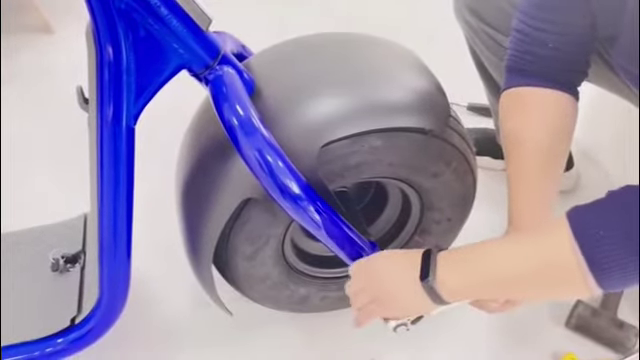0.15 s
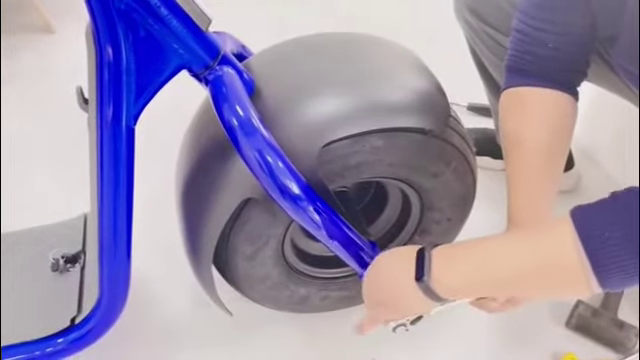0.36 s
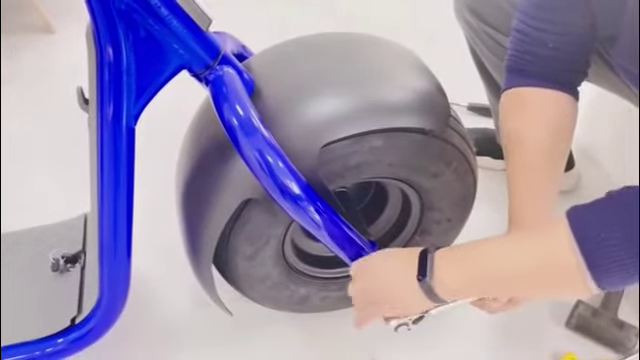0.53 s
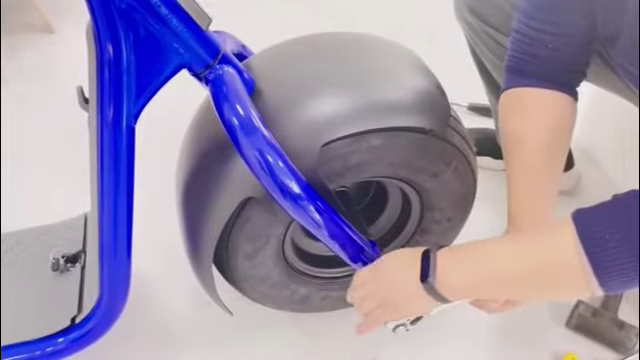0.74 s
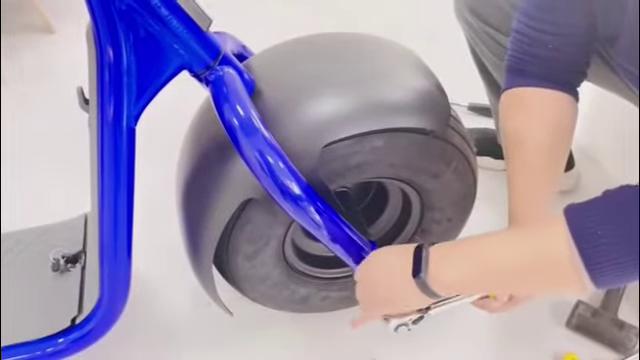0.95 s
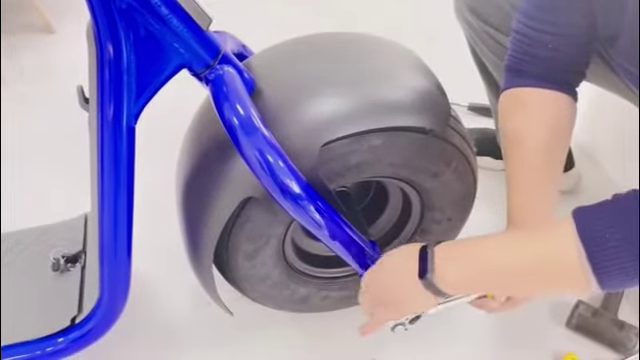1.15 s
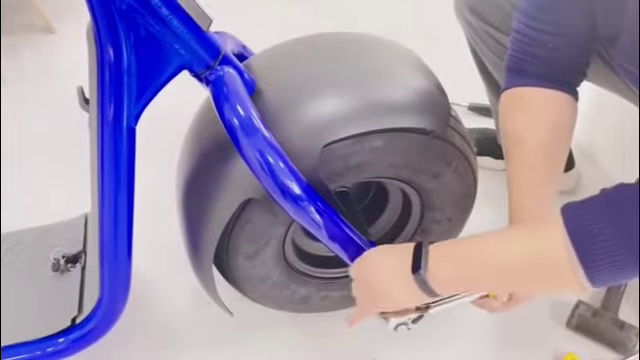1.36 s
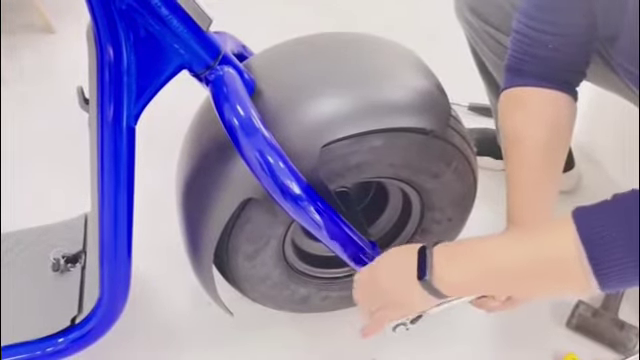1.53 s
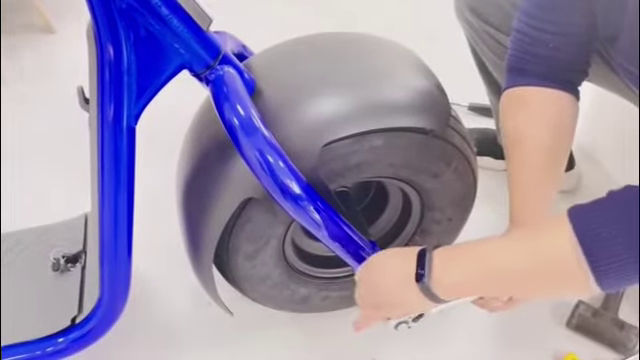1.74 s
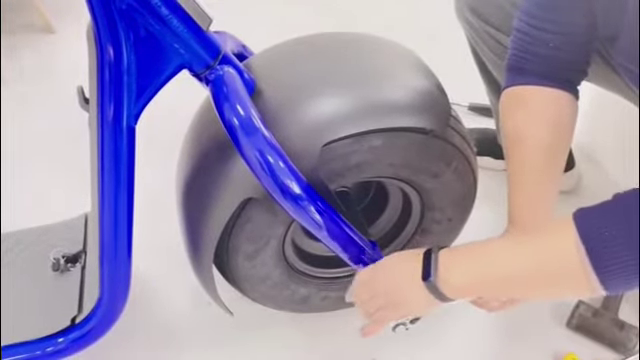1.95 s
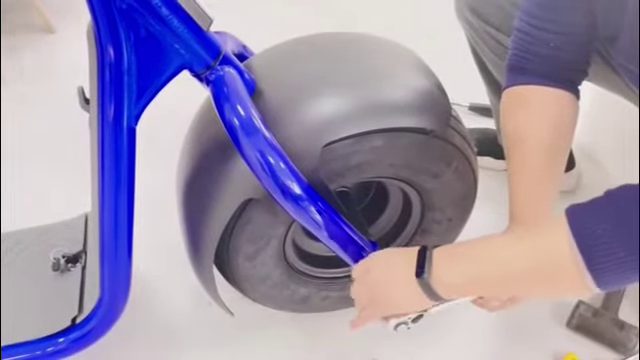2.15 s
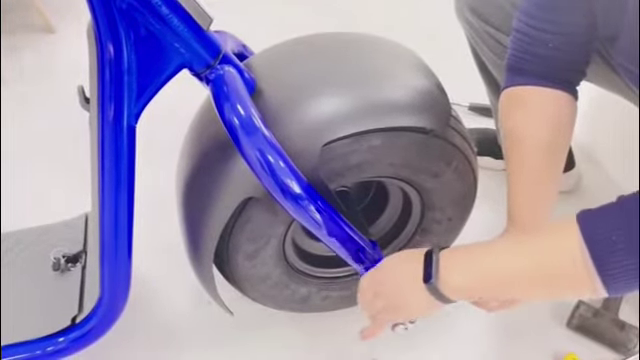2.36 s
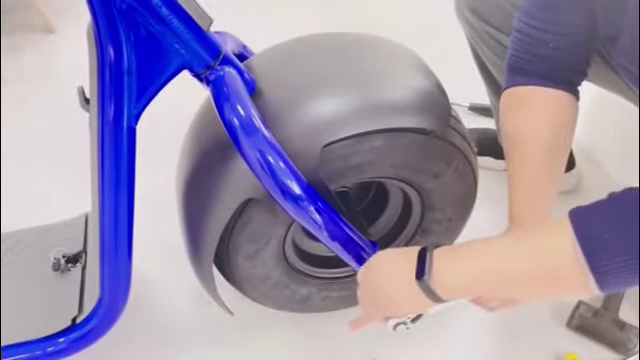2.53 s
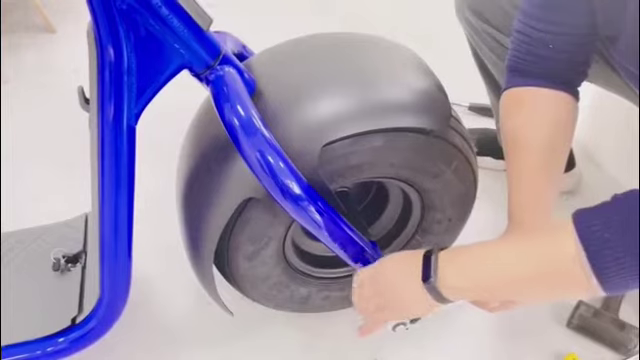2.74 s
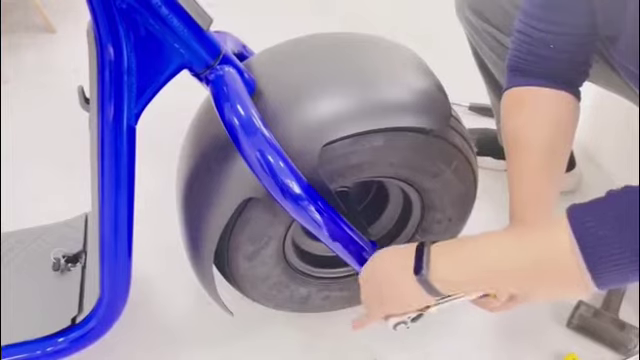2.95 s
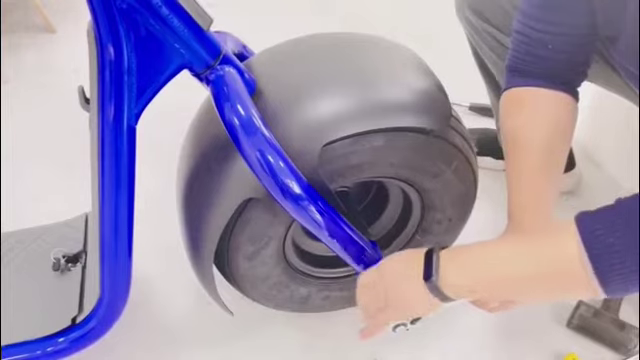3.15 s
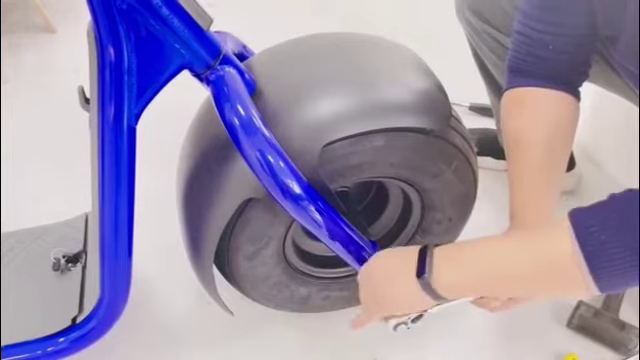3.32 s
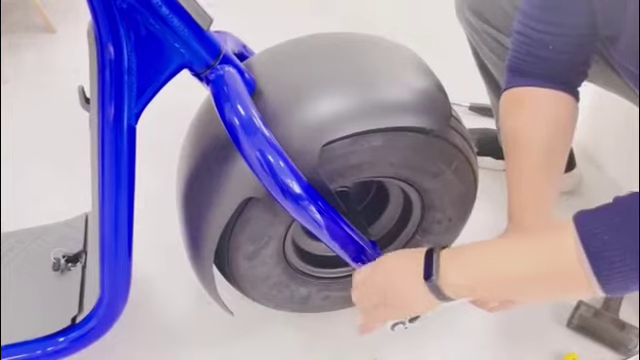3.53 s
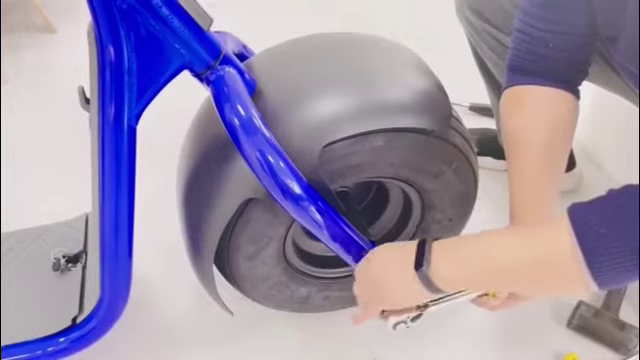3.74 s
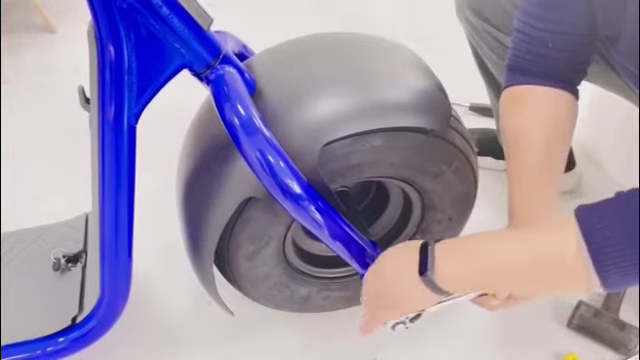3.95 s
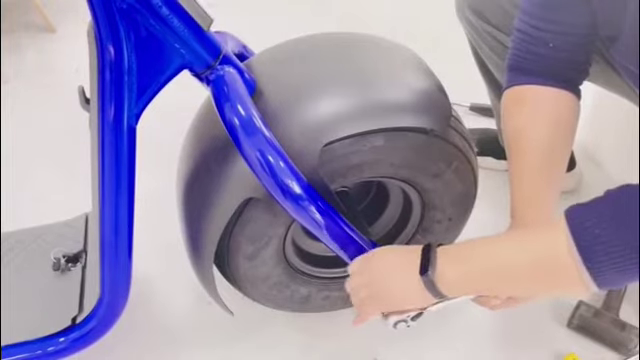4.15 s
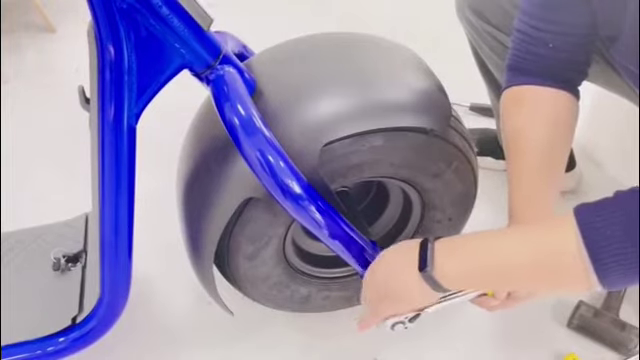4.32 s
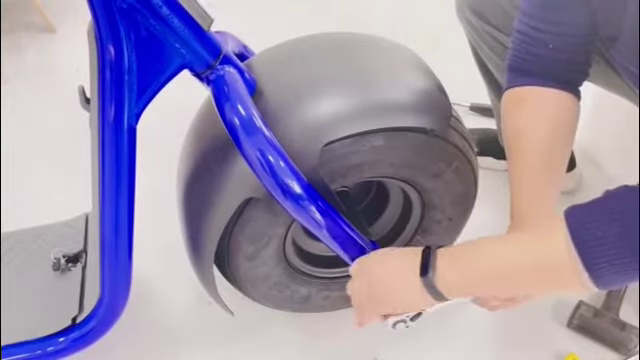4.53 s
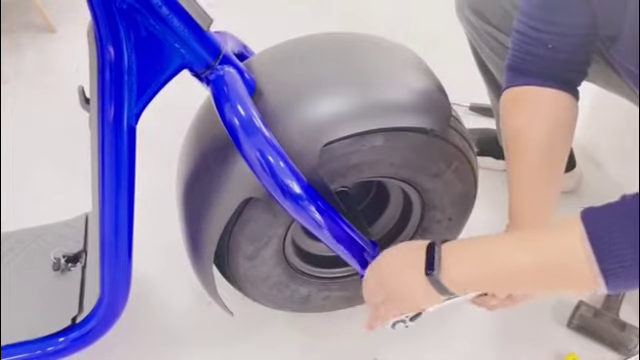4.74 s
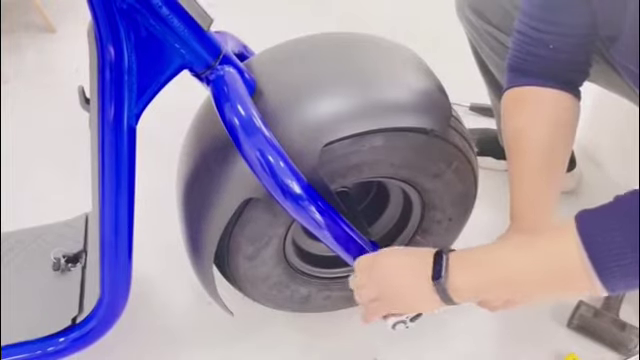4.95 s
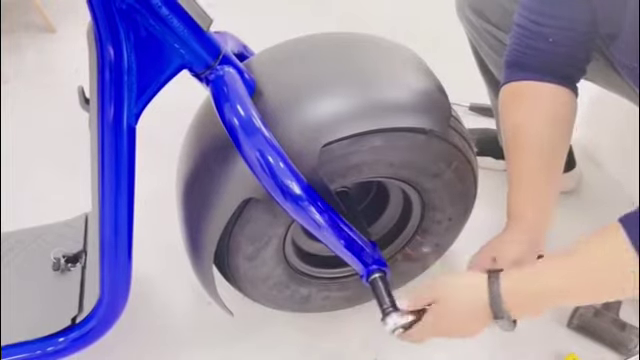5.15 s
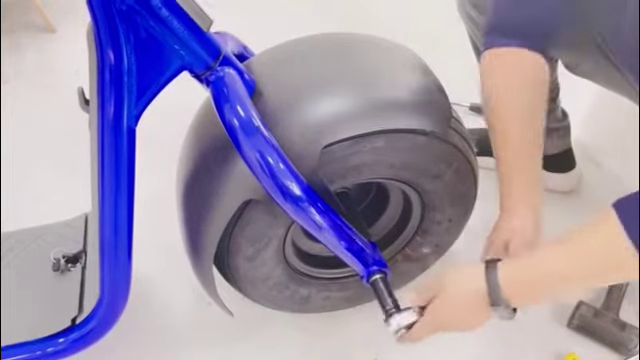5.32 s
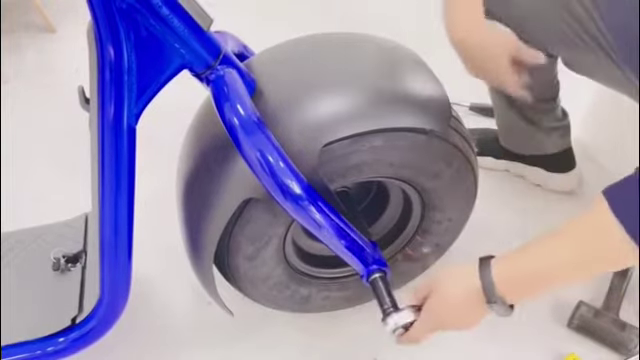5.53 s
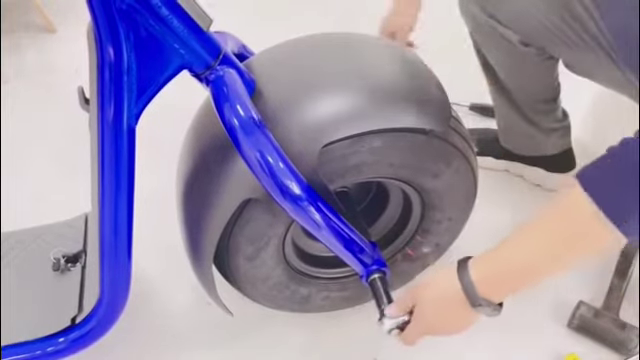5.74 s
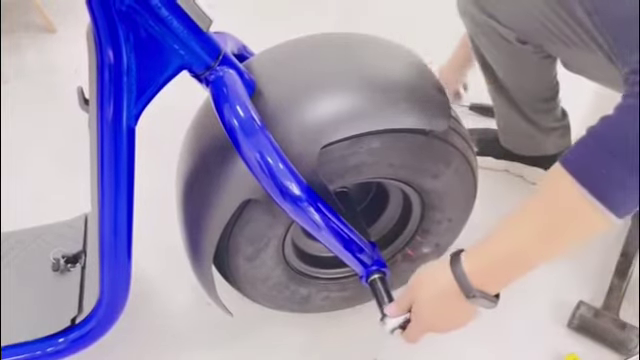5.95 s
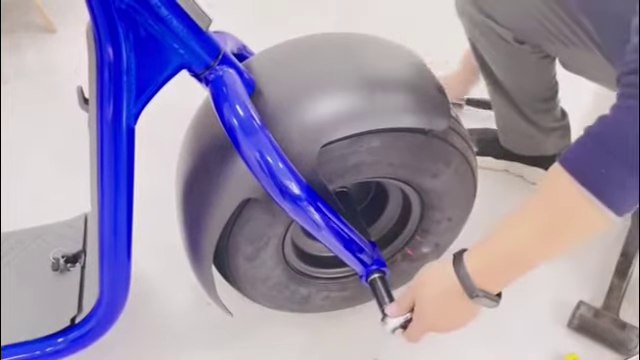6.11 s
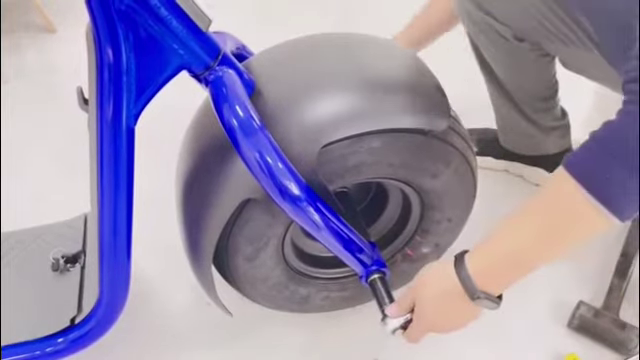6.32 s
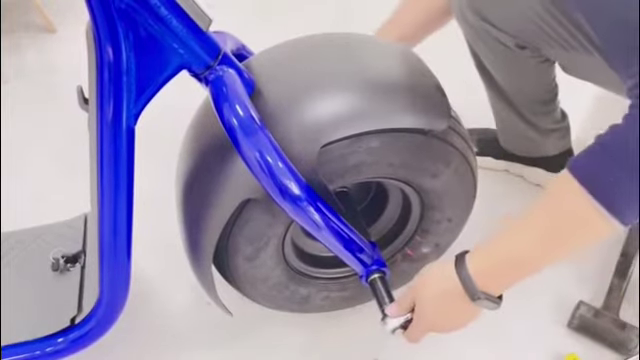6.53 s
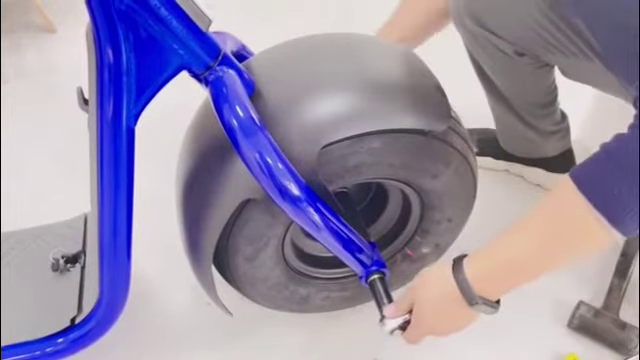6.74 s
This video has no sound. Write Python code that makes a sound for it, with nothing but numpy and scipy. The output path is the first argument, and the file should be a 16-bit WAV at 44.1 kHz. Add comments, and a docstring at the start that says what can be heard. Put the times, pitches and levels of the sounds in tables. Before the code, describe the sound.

Fast, bright ratchet zips repeat about every 0.4 seconds with dull socket knocks between, ending in sparse clicks and a sharp double clank.

```python
"""Ratchet wrench on an axle nut

A ratchet wrench tightens the axle nut of a fat wheel in a steel tube frame, in a bare workroom.
On each back swing the pawl snaps over the teeth: noisy impacts excite modes of the wrench head and the frame.
Softened impacts give the dull knocks of the socket; single teeth, then two hard blows on the axle, come last.
Slipping noise makes a helper's clothes rustle; shaped noise and a sine make the ventilation and mains hum."""
import sys
import numpy as np
from scipy import signal
from scipy.fft import rfft, irfft
from scipy.io import wavfile
from scipy.ndimage import uniform_filter1d

SR = 44100
rng = np.random.default_rng(int(sys.argv[2]) if len(sys.argv) > 2 else 0)


def generate_wav(signal):
    """Clip the signal to [-1, 1] and save it as 16-bit WAV at the path in sys.argv[1]."""
    frames = np.transpose(np.atleast_2d(signal))
    scaled = np.clip(frames, -1, 1) * 32767
    pcm = np.round(scaled).astype(np.int16)
    wavfile.write(sys.argv[1], SR, pcm)


N = 303408
T = np.arange(N) / SR
HZ = np.fft.rfftfreq(N, 1 / SR)


def undb(db):
    """Decibel definition: amplitude gain grows tenfold every 20 dB."""
    return 10 ** (np.asarray(db) / 20)


def unit(x):
    """Energy normalisation: the sum of squares becomes one."""
    return x / np.sqrt(np.sum(x ** 2))


def along(hz, points, values):
    """Logarithmic frequency scale: interpolate a curve between its points."""
    return np.interp(np.log(hz + 1), np.log(points), values)


def convolve(x, response):
    """Linear superposition: every sample of a sound launches the response."""
    return signal.fftconvolve(x, response)[:N]


def add(track, s, sound):
    """Superposition: mix a short sound into a track at time s."""
    start = max(0, int(s * SR))
    track[start:start + len(sound)] += sound[:max(0, N - start)]


def low_cut(x, corner_hz):
    """High-pass filtering: take away the bass."""
    return signal.sosfilt(signal.butter(2, corner_hz, "high", fs=SR, output="sos"), x)


def soften(force, corner_hz, order=2):
    """Contact stiffness: a softer contact lasts longer and loses its treble."""
    return signal.lfilter(*signal.butter(order, min(corner_hz, SR / 3), fs=SR), force)


def two_ears(mid, side, wide_hz):
    """Diffuse-field coherence: long waves reach both ears alike, short ones differ."""
    side = signal.lfilter(*signal.butter(1, wide_hz, "high", fs=SR), side)
    return np.array([mid + side, mid - side])


# ventilation noise spectrum: (frequency [Hz], relative spectral density [dB per Hz])
AIR_SPECTRUM = [(13, -57), (22, -14), (59, 1), (263, -18.5), (294, -16.5), (482, -27.5), (1670, -37),
                (2520, -35), (3810, -45.5), (4260, -42.5), (7000, -51.5), (8490, -52), (9220, -53),
                (14700, -63), (16000, -62)]
AIR_DB = -45  # level of the part common to both ears
HUM_HZ, HUM_DB = 49, -55.5


def ventilation():
    """Stationary random noise: a steady coloured rumble, with a sinusoidal mains hum."""
    noise = rfft(rng.standard_normal((2, N)))
    mid, side = irfft(noise * undb(along(HZ, *np.transpose(AIR_SPECTRUM))), N)
    rumble = undb(AIR_DB) * two_ears(mid, 0.6 * side, wide_hz=345) / mid.std()
    hum = np.sqrt(2) * undb(HUM_DB) * np.sin(2 * np.pi * HUM_HZ * T)
    return rumble + hum


# clothing as the helper stands up: (time [s], level [dB])
RUSTLE = [(5.8, -84), (5.97, -57.5), (6.06, -68), (6.14, -59.5), (6.45, -86)]


def clothing(low_hz, high_hz, grit_db):
    """Stick-slip friction: cloth slides in tiny uneven slips."""
    unevenness = np.repeat(rng.standard_normal(N // 128 + 1), 128)[:N]
    slips = rng.standard_normal(N) * undb(grit_db * unevenness)
    cloth = soften(low_cut(slips, low_hz), high_hz, order=1)
    level_db = np.interp(T, *np.transpose(RUSTLE), left=-np.inf, right=-np.inf)
    return cloth / cloth.std() * undb(level_db)


# the room's tail: (band centre [Hz], reverberation time [s], relative level [dB])
ROOM_BANDS = [(147, 0.69, 9), (580, 0.71, -6), (1330, 0.57, -9.5), (3480, 0.51, -13), (4960, 0.46, -9.5),
              (9000, 0.45, -12), (13900, 0.21, -17.5)]


def room(wall_s, build_s):
    """Reverberation: bands of noise start with the nearest wall and decay at their own rates."""
    t = T[:SR * 2 // 3]
    freqs = np.fft.rfftfreq(len(t), 1 / SR)
    centres = [row[0] for row in ROOM_BANDS]
    noise, tail = rfft(rng.standard_normal(len(t))), 0
    onset = np.clip((t - wall_s) / build_s, 0, 1)
    for (hz, t60, db), band in zip(ROOM_BANDS, np.eye(len(ROOM_BANDS))):
        band_noise = irfft(noise * along(freqs, centres, band), len(t))
        decay = np.exp(-np.log(1000) * t / t60)
        tail = tail + undb(db) * band_noise * unit(onset * decay)
    return tail


def even(x, span_hz):
    """Spectral whitening: level out broad colour and keep the fine ripple."""
    spectrum = rfft(x)
    power = uniform_filter1d(np.abs(spectrum) ** 2, max(3, int(span_hz * len(x) / SR)))
    return unit(irfft(spectrum / np.sqrt(power), len(x)))


def place(x, left_db, lead_s, near_db, near_s, room_db):
    """Interaural differences: direct sound leads on the left; scatter off floor, wheel and mudguard, then room."""
    t = np.maximum(T[:SR // 16] - .003, 0)
    fields = []
    for _ in range(2):
        scatter = even(rng.standard_normal(len(t)) * t * np.exp(-t / near_s), span_hz=120)
        echoes = undb(room_db) * room(wall_s=0.0067, build_s=0.0033)
        add(echoes, 0, undb(near_db) * scatter)
        fields.append(convolve(x, echoes))
    # a windowed sinc delays the right ear by a fraction of a sample
    taps = np.arange(-8, 9)
    late = np.convolve(x, np.sinc(taps - lead_s * SR) * np.hanning(len(taps)), "same")
    direct = undb(np.array([[left_db], [-left_db]]) / 2) * np.array([x, late])
    return direct + two_ears(*fields, wide_hz=1300)


def contact(rise_s, fall_s, grit_db, size=1024):
    """Rough impact: steel chatters on steel in micro-impacts, with the energy of 4 ms at full level."""
    t = T[:size]
    chatter = rng.standard_normal(size) * undb(grit_db * rng.standard_normal(size))
    envelope = np.minimum(t / rise_s, 1) ** 2 * np.exp(-np.maximum(t - rise_s, 0) / fall_s)
    return unit(chatter * envelope) * np.sqrt(.004 * SR)


def snap(spectrum, modes=(), size=8192):
    """Minimum phase: the most prompt causal response with a broad spectrum and resonances standing out of it."""
    freqs = np.fft.rfftfreq(size, 1 / SR)
    peaks = sum(undb(db) ** 2 / (1 + (2 * (freqs - hz) / width) ** 2) for hz, width, db in modes)
    magnitude = undb(along(freqs, *np.transpose(spectrum))) * np.sqrt(1 + peaks)
    # folding the cepstrum onto positive times makes the response causal
    cepstrum = irfft(np.log(magnitude))
    cepstrum[1:size // 2] *= 2
    cepstrum[size // 2 + 1:] = 0
    return unit(irfft(np.exp(rfft(cepstrum))))


# the socket and wrench shifting on the nut, and at last a light tick as the helper picks up a tool: (time [s],
# relative level [dB], contact hardness [Hz])
KNOCKS = [(0.172, -34, 635), (0.707, -36.5, 750), (0.853, -22, 600), (1.008, -34.5, 910),
          (1.416, -35.5, 1300), (1.951, -38, 1010), (2.659, -38, 900), (3.048, -33.5, 890),
          (3.273, -20, 600), (3.431, -39.5, 1480), (3.481, -30.5, 650), (3.517, -31, 670),
          (3.781, -35, 876), (4.277, -34.5, 920), (4.533, -38.5, 900), (4.666, -38, 945),
          (4.824, -24, 1220), (4.950, -42, 1100), (5.123, -48.5, 1000), (5.486, -26.5, 593),
          (5.587, -26, 620), (5.79, -42, 1100), (5.793, -26, 580), (6.111, -53, 9100)]


def knocks():
    """Soft impact: dull knocks as play in socket and nut is taken up, and a light tick of the helper's tool;
    returns the force on the frame."""
    force = np.zeros(N)
    for s, db, hard_hz in KNOCKS:
        push = contact(rise_s=.002, fall_s=.005, grit_db=2)
        add(force, s, undb(db) * soften(push, hard_hz))
    return force


# frame, axle and rim: (frequency [Hz], width [Hz], height over the dense modes [dB])
FRAME = [(540, 60, 7), (587, 45, 10.5), (772.6, 12.4, 13), (825, 5, 13.5), (887, 20, 6), (1092, 78, 15),
         (1274, 43, 9), (1415.4, 23, 19), (1737, 36, 11.5), (1958, 58, 12.5), (2104, 56, 11.5),
         (2498, 160, 5.5), (2970, 13, -8), (3292, 173, 4)]
# dense short modes of the frame driven through the socket: (frequency [Hz], relative level [dB])
CLACK = [(200, -6.5), (420, -11), (560, 2), (1100, 0), (1600, -2.5), (2200, 1), (4000, -1.5), (8000, -2.5),
         (15000, -7.5)]


def ringing_frame(tooth_force):
    """Forced modal response: teeth and knocks drive the frame through the socket."""
    # small contacts are too light to move the whole frame, so they carry little bass
    light = low_cut(soften(tooth_force, corner_hz=2880) + undb(5) * knocks(), corner_hz=313)
    return undb(1.5) * convolve(light, snap(CLACK, FRAME))


# hard blows on the axle and their rebounds: (time [s], relative level [dB], contact hardness [Hz])
BLOWS = [(6.5568, -17, 2050), (6.57, -22, 1000), (6.6511, -17, 5630), (6.667, -29.5, 4110),
         (6.720, -35, 4590), (6.731, -33, 3480), (6.833, -47.5, 4000)]


def blows(push_db, chatter_db):
    """Impulsive force: a clean push on the axle and a brief rattle of the wheel; returns the force on the frame."""
    force = np.zeros(N)
    for s, db, hard_hz in BLOWS:
        chatter = contact(rise_s=0.001, fall_s=0.0029, grit_db=-0.5)
        push = np.linalg.norm(chatter) * signal.unit_impulse(len(chatter), SR // 1500)
        hit = undb(chatter_db) * chatter + undb(push_db) * push
        add(force, s, undb(db) * soften(hit, hard_hz, order=1))
    return force


# dense short modes of the struck axle: (frequency [Hz], relative level [dB])
STRIKE = [(60, -3), (200, -12.5), (400, -10.5), (580, 2.5), (1000, 0), (1600, -2), (2200, 5), (4000, -0.5),
          (6300, -7.5), (8000, -31), (15000, -18)]
# thin ping of the steel at the point of impact: (frequency [Hz], width [Hz], height over the dense modes [dB])
PING = [(9370, 720, 24.5)]
STRUCK_DB = -2.5  # height of the frame's modes under a blow, against their height under a click


def struck_axle():
    """Impulse response: a direct blow rings the same tubes over a fuller thud."""
    tubes = [(hz, width, db + STRUCK_DB) for hz, width, db in FRAME]
    force = blows(push_db=-7, chatter_db=-0.5)
    return undb(4.5) * convolve(force, snap(STRIKE, tubes + PING))


# wrench head and socket, before shifts: (frequency [Hz], width [Hz], relative level [dB])
HEAD = [(3280, 73, -3), (4208, 86, 2.5), (4317, 114, 0), (4400, 230, -12.5), (5130, 200, -23.5),
        (5660, 800, -14), (7490, 19, -17.5), (8650, 240, -12), (8660, 240, -9), (11200, 430, -22),
        (11970, 490, -15.5)]


def head_ring(damping, pitch, spread_db, detune, size=5000):
    """Modal damping: wider modes die sooner; grip and point of contact shift strengths and pitches."""
    hz, width, db = np.transpose(HEAD)[:, :, None]
    strength, shift, phase = rng.standard_normal((3, len(HEAD), 1))
    t = T[:size]
    decay = np.exp(-np.pi * width * damping * t)
    waves = decay * np.sin(2 * np.pi * (hz * (pitch + detune * shift) * t + phase))
    return unit(np.sum(undb(db + spread_db * strength) * width * waves, axis=0))


# the hand surges once a swing: extra speed [share], time constant [s], and how much harder the teeth strike [dB]
SURGE, SURGE_S, SURGE_HEAD_DB, SURGE_FRAME_DB = .45, .036, 1, 3
# no two teeth are alike: spread of the log spacing, and of the levels [dB]
UNEVEN, HEAD_SPREAD_DB, FRAME_SPREAD_DB = .1, 1.36, 1.72


def swing(first_s, last_s, fastest_s, teeth, slow_tooth, wait_s, head_db, frame_db, jolt_db):
    """Kinematics: teeth come closer and strike harder as the hand speeds up; rows (s, head dB, frame dB)."""
    teeth = int(round(teeth))
    spacing, head_luck, frame_luck = rng.standard_normal((32, 3))[:teeth].T

    def surge(s):
        """Speed profile: a bell curve around the fastest moment."""
        return np.exp(-((s - fastest_s) / SURGE_S) ** 2)

    hesitates = np.arange(1, teeth) == round(slow_tooth)
    s = np.linspace(first_s, last_s, teeth)
    # times and speeds depend on each other, so settle them by repetition
    for _ in range(3):
        speed = 1 + SURGE * surge((s[1:] + s[:-1]) / 2)
        gaps = np.exp(UNEVEN * spacing[1:]) / speed * ~hesitates
        gaps = gaps * (last_s - first_s - wait_s) / gaps.sum() + wait_s * hesitates
        s = first_s + np.append(0, np.cumsum(gaps))
    jolt = jolt_db * (np.arange(teeth) == 0)
    head_luck_db = HEAD_SPREAD_DB * (head_luck - head_luck.mean())
    frame_luck_db = FRAME_SPREAD_DB * (frame_luck - frame_luck.mean())
    return np.transpose([s, head_db + jolt + SURGE_HEAD_DB * surge(s) + head_luck_db,
                         frame_db + jolt + SURGE_FRAME_DB * surge(s) + frame_luck_db])


LET_GO_S = 5.2  # the hand leaves the wrench head
# head gripped and let go: (damping factor, pitch factor, scatter of pitch [share], level of the ring [dB])
GRIPPED, FREE = (0.87, 1.0055, 0, 0), (1.05, 1.022, .005, 0.84)
CHATTER_S, EASED_CHATTER_S = .0025, .0018  # decay of the chatter: in a swing, and for an eased tooth
# rebound: level at the usual spacing [dB], that spacing [s], loss per doubling [dB], spacing that lets it settle [s]
BOUNCE_DB, TOOTH_S, SLOW_DB, SETTLE_S = -9.5, 0.011, 4, .025
EASED_LOW_HZ, EASED_HIGH_HZ = 2600, 10500  # band of an eased tooth's snap
# back swings of the handle: (first tooth [s], last tooth [s], fastest moment [s], teeth [count],
# tooth after which the hand hesitates [count], length of that hesitation [s], relative level in the head [dB],
# relative level passed into the frame [dB], level change of the first tooth [dB])
SWINGS = [(0.002, 0.067, 0.02, 6, 5, 0.014, -26.5, -33, 1.5),
          (0.330, 0.508, 0.460, 13, 6, 0.017, -25.5, -33.5, -3),
          (0.773, 0.913, 0.850, 12, 10, .026, -25.5, -33, -0.5),
          (1.165, 1.325, 1.255, 13, 12, .033, -27, -33.5, 3.5),
          (1.561, 1.736, 1.700, 12, 3, .031, -26.5, -32.5, 0),
          (2.002, 2.159, 2.090, 12, 1, 0.026, -26, -32, -2),
          (2.41, 2.558, 2.505, 14, 3, .021, -26.5, -32, 2.5),
          (2.816, 2.963, 2.900, 11, 10, 0.045, -25.5, -32.5, 0),
          (3.189, 3.341, 3.262, 14, 13, .031, -27, -31, 1.5),
          (3.577, 3.704, 3.670, 12, 11, .023, -25, -31, -1),
          (3.953, 4.078, 4.045, 11, 3, .016, -24.5, -30, -2.5),
          (4.334, 4.473, 4.410, 13, 12, 0.022, -27, -34, 2.5),
          (4.723, 4.831, 4.810, 10, 1, .020, -24, -34, -1)]
# single teeth as the handle is eased round: (time [s], relative level in the head [dB], relative level in the frame [dB])
CLICKS = [(5.481, -27, -32), (5.5815, -27, -34), (5.6565, -24.5, -32)]
# dense short modes of the pawl: (frequency [Hz], relative level [dB])
SNAP = [(300, -22), (900, 5.5), (2000, -1), (3000, 7), (4500, 3), (6200, 4.5), (7500, 5), (9000, 7),
        (12000, 6.5), (13600, 3.5), (15200, -5), (16000, -17)]


def ratchet(slide_s, scrape_s, scrape_db, last_db):
    """Repeated impact: the pawl slides off each tooth and lands; returns snap, head ring and force on the frame."""
    pawl, head, frame = np.zeros((3, N))
    teeth = np.vstack([swing(*row) for row in SWINGS] + [CLICKS])
    gaps = np.maximum(np.diff(teeth[:, 0], append=N / SR), 1 / SR)
    for (s, head_db, frame_db), gap in zip(teeth, gaps):
        # the hand lies on the head during the work; afterwards the ring is higher, stronger and a little shorter
        working = s < LET_GO_S
        damping, pitch, detune, ring_db = GRIPPED if working else FREE
        steel = undb(ring_db) * head_ring(damping, pitch, spread_db=2, detune=detune)
        # the last tooth lands as the hand comes to rest
        drop_db = last_db if working and gap > .15 else 0
        # in a fast swing the pawl cannot settle: it bounces between teeth, harder the faster they come
        bounce_db = BOUNCE_DB - SLOW_DB * np.log2(gap / TOOTH_S) if gap < SETTLE_S else -np.inf
        # a faint scrape up the flank of the tooth, the drop, the bounce
        for at, db in [(s - scrape_s, scrape_db), (s, drop_db), (s + gap / 2, bounce_db)]:
            fall_s = CHATTER_S if working else EASED_CHATTER_S
            force = undb(head_db + db) * contact(rise_s=0.002, fall_s=fall_s, grit_db=1)
            if not working:
                # an eased tooth drops slowly and without load: thin and less sharp
                force = soften(low_cut(force, EASED_LOW_HZ), EASED_HIGH_HZ)
            add(pawl, at - slide_s, force)
            add(head, at - slide_s, signal.fftconvolve(force, steel))
            add(frame, at, undb(frame_db + db) * contact(rise_s=0.0013, fall_s=0.0055, grit_db=2.5))
    return convolve(pawl, snap(SNAP)), head, frame


def scene():
    """Superposition: pawl, wrench head, frame and axle sound in the room, over clothing and ventilation."""
    pawl, head, tooth_force = ratchet(slide_s=.0003, scrape_s=0.0032, scrape_db=-11.5, last_db=-1.0)
    frame = ringing_frame(tooth_force)
    axle = struck_axle()
    return (ventilation()
            + clothing(low_hz=1800, high_hz=2600, grit_db=1.2)
            + place(frame, left_db=2.3, lead_s=.000008, near_db=-5.5, near_s=0.0039, room_db=-0.2)
            + place(axle, left_db=2.5, lead_s=.000018, near_db=-3.5, near_s=0.0039, room_db=3.0)
            + place(undb(-3.0) * head, left_db=5.0, lead_s=.000008, near_db=-13.5, near_s=0.0089, room_db=-4)
            + place(undb(-7.5) * pawl, left_db=-2.5, lead_s=.000019, near_db=-3.5, near_s=0.0021, room_db=-0.3))


BASS_HZ, TOP_HZ = 41.3, 15700  # edges of the microphone's band


def record(dry):
    """Band limitation: the microphone cuts the deepest bass and the top."""
    top_cut = signal.ellip(8, .2, 70, TOP_HZ, fs=SR, output="sos")
    return signal.sosfilt(top_cut, low_cut(dry, BASS_HZ))


dry = scene()
out = record(dry)
generate_wav(out)
```